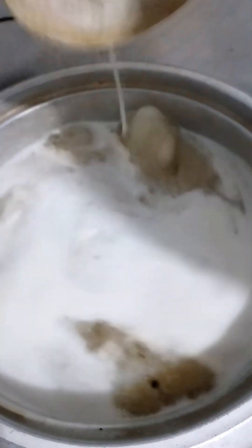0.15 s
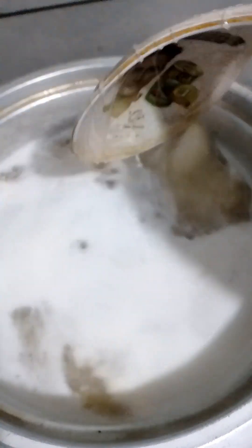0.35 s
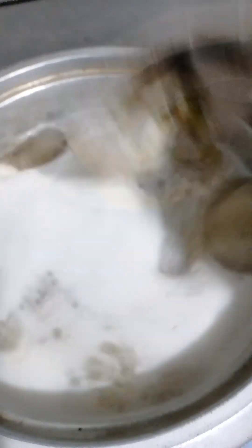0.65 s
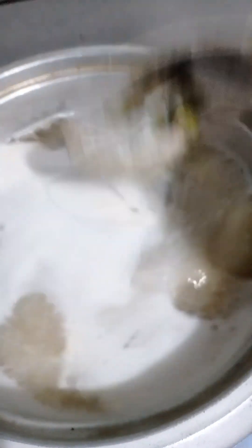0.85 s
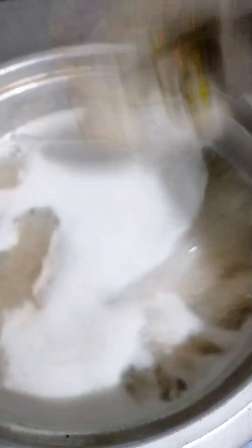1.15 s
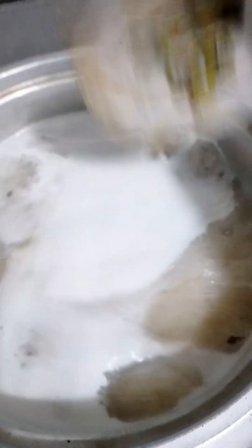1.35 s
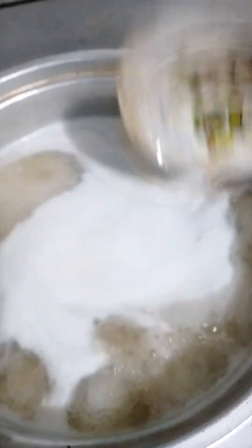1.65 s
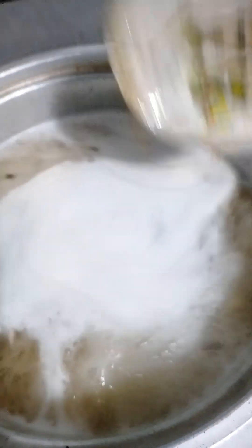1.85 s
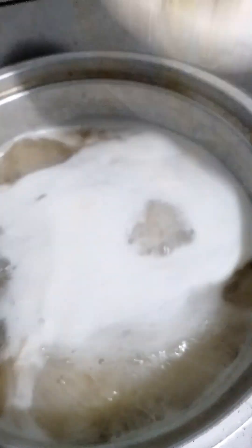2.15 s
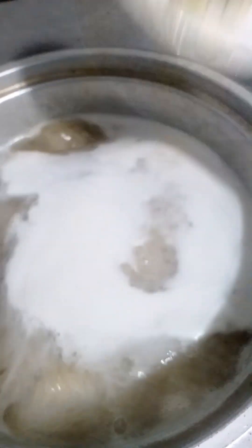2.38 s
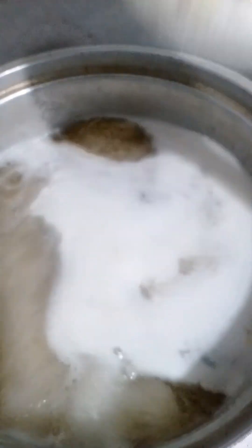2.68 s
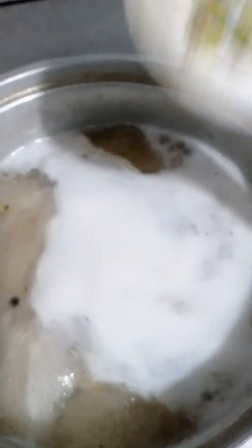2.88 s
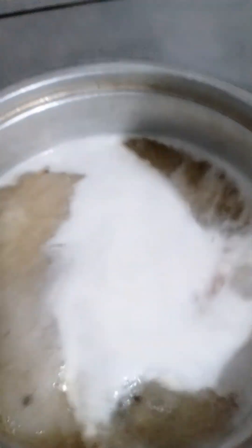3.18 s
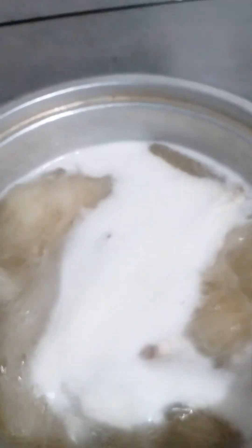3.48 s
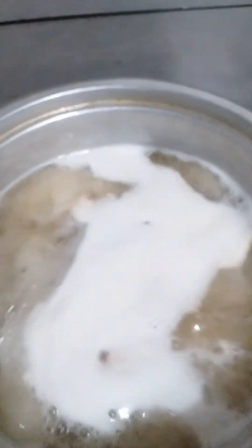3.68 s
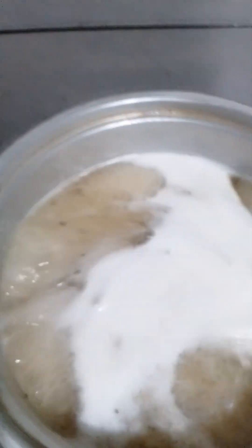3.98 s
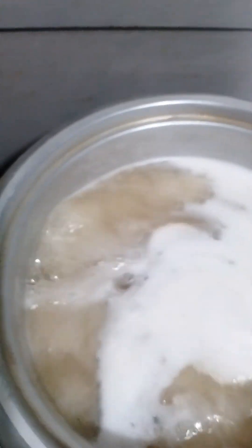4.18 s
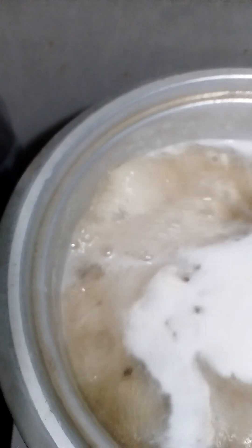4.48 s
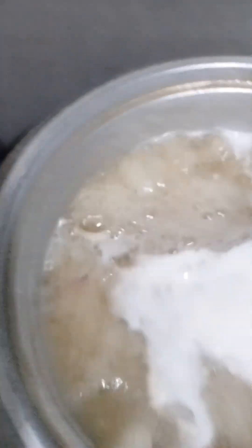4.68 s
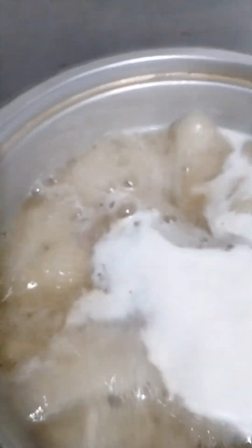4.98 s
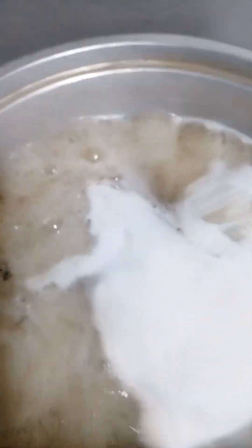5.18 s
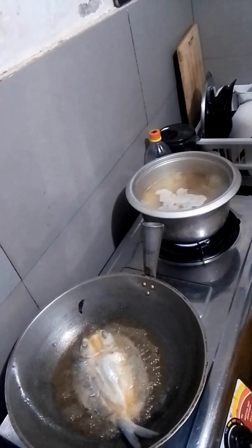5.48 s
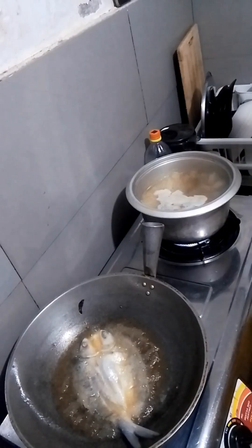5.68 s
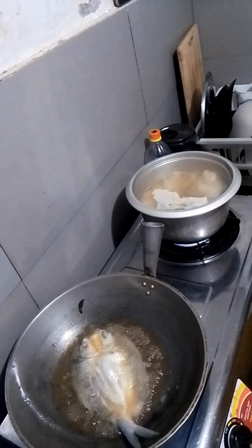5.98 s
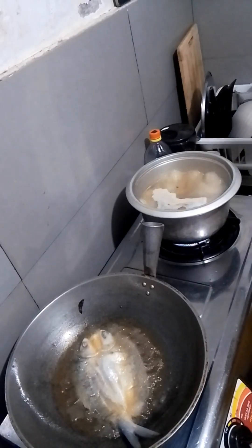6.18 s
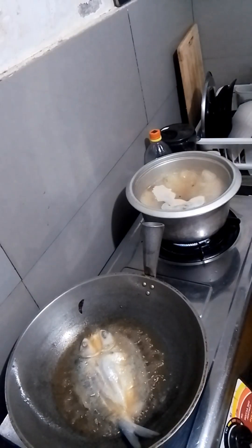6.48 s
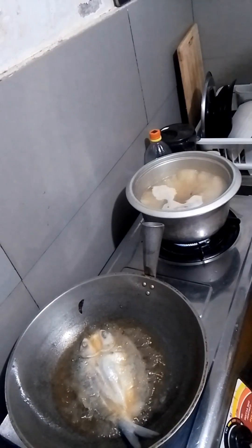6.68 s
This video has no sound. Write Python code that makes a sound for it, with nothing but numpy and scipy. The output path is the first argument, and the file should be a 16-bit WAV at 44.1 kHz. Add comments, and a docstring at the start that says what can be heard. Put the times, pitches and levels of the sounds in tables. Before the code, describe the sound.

A pot simmers on a gas burner, a china bowl clinks down, then a fish sizzles and crackles in hot oil.

```python
"""In a small tiled kitchen a pot simmers on a gas burner. Utensils knock lightly, and stray water drops
spit now and then in the hot oil of a wok. A china bowl is set down and rocks on its foot with a
rattling clink. The sound clicks off for a moment. Then a whole fish is frying close by, over the burner
and a faint hum: bursting bubbles swell into a dense crackle and fizz, with larger pops of steam."""
import sys
import numpy as np
from scipy import signal
from scipy.fft import rfft, irfft, next_fast_len
from scipy.io import wavfile
from scipy.ndimage import uniform_filter1d, map_coordinates

SR = 44100
rng = np.random.default_rng(int(sys.argv[2]) if len(sys.argv) > 2 else 0)


def dump(signal):
    """Clip the signal to [-1, 1] and save it as 16-bit WAV at the path in sys.argv[1]."""
    limited = np.clip(np.atleast_2d(signal).T, -1, 1)
    pcm = np.round(limited * 32767).astype(np.int16)
    wavfile.write(sys.argv[1], SR, pcm)


N = 301644
TIME = np.arange(N) / SR
AGE = np.arange(SR // 2) / SR  # seconds since the start of a single hit
BREAK_S, FRY_START_S = 5.453, 5.549  # silence lies between these
TOP_HZ = 15800


# The tone of the fizzing oil. Each row: frequency in Hz, gain in dB.
FIZZ_EQ = [(120, -35.5), (200, -7.5), (236, -19.5), (340, -3.5), (393, -17), (499, -7), (633, -23.5),
           (774, -5), (1120, -11), (1520, -10.5), (3220, 1), (6000, -11.5), (8030, -17), (12500, -36.5),
           (15800, -32.5)]
def frying(coarse_db=-6.5, fine_db=-17, fizz_db=-4, spikiness=0.54):
    """Coarse and fine bubbles over a fizz of tiny ticks; all follow the boil of the oil."""
    coarse = amp(coarse_db) * crackle(count=1200, centre_hz=3210, spread=0.359)
    fine = amp(fine_db) * crackle(count=500, centre_hz=7930, spread=0.063)
    ticks = rng.standard_normal(N) * np.exp(spikiness * rng.standard_normal(N))
    fizz = amp(fizz_db) * unit_rms(coloured(patchy(ticks, depth_db=2.5), FIZZ_EQ))
    return amp(boil_db()) * (coarse + fine + fizz) * (TIME > FRY_START_S)


def crackle(count, centre_hz, spread, scatter_db=3):
    """A shower of bursting steam bubbles, most faint and a few strong."""
    starts = rng.integers(int(FRY_START_S * SR), N, count)
    hz = np.clip(centre_hz * np.exp(spread * rng.standard_normal((count, 1))), 500, 12000)
    strength = amp(scatter_db * np.minimum(rng.exponential(size=(count, 1)), 4))
    offsets = np.arange(384)
    bubbles = strength * ping(hz, cycles=1.3, t=offsets / SR)
    shower = np.bincount((starts[:, None] + offsets).ravel(), bubbles.ravel(), N)[:N]
    shower = mic_colour(kitchen(shower, near_db=-3, room_db=-4.5))
    return shower / np.std(shower[TIME > FRY_START_S])


def boil_db(steady_db=-31, waver_db=0.94, stir_db=2.5, settle_s=0.022):
    """The frying swells in, wavers, and flares briefly as each main pop stirs up the oil."""
    stir = sum((TIME > s) * np.exp(-np.abs(TIME - s) / settle_s) for s, _, _ in STEAM_POPS)
    return steady_db + swell_db() + stir_db * stir + waver_db * wobble(rate=30)


def swell_db(depth_db=8, rise_s=0.19):
    """The frying's fade-in: it climbs to 0 dB, then holds."""
    return depth_db * np.clip((TIME - FRY_START_S) / rise_s - 1, -1, 0)


# The main pops around the fish. Each row: start in seconds, level in dB, pitch in Hz.
STEAM_POPS = [(5.757, -21.5, 2510), (5.814, -24, 2880), (5.93, -23, 2670), (6.004, -15.5, 2680),
              (6.089, -20, 2700), (6.231, -21, 2960), (6.326, -21, 2900), (6.5531, -16.5, 1550),
              (6.613, -18.5, 3800), (6.626, -27.5, 930), (6.658, -23, 2340), (6.7, -25, 2760)]
def steam_pops():
    """Bigger pockets of steam escape from under the fish, a few loud among many lesser ones."""
    out = np.zeros(N)
    lesser = scattered(FRY_START_S, TIME[-1], count=18, db=-25, scatter_db=2, hz=2900, octaves=0.28)
    for start, db, hz in list(STEAM_POPS) + lesser:
        add(out, start, amp(db) * kitchen(ping(hz, cycles=0.89), near_db=0, room_db=-2.5))
    return out * amp(swell_db())


# The clear spits of the heating oil. Each row: start in seconds, level in dB, pitch in Hz,
# snap in dB relative to the tone.
OIL_SPITS = [(0.8109, -29.5, 4980, 1.5), (.9135, -32, 3630, 2), (1.4134, -28.5, 4970, -10),
             (1.549, -25, 8170, -16), (2.3927, -25, 2910, -5), (2.6139, -27, 4820, -8),
             (2.829, -31.5, 5140, -5), (3.1388, -23, 4680, -3.5), (3.8352, -32, 6230, -0.5),
             (3.92, -25.5, 3950, -1), (4.4245, -35, 2800, 2), (4.441, -34.5, 6860, -13)]
def oil_spits(beam_db_per_octave=5, faint_snap_db=-7):
    """Stray water drops burst in the oil, each with a snap and its own pitch."""
    out = np.zeros(N)
    faint = scattered(0, BREAK_S, count=12, db=-44.5, scatter_db=1, hz=2670, octaves=0.39)
    for start, db, hz, snap_db in list(OIL_SPITS) + [(*row, faint_snap_db) for row in faint]:
        bright_snap = np.diff(snap(t60=0.003), prepend=0) / 2
        burst = ping(hz, cycles=1.07) + amp(snap_db) * bright_snap
        # The wok beams the highest spits past the walls, so they sound drier.
        drier_db = beam_db_per_octave * max(np.log2(hz / 4500), 0)
        spit = kitchen(burst, near_db=4.5 - drier_db, room_db=-3 - drier_db, near_t60=0.096)
        add(out, start, amp(db) * spit)
    return out


# The bowl touches down and rocks. Each row: start in seconds, ring level in dB,
# treble roll-off of the ring in Hz, clack level in dB.
BOWL_CONTACTS = [(4.6075, -13, 7000, 2.5), (4.6147, -13, 7000, -3.5), (4.6225, -22, 6000, -15.5),
                 (4.645, -44, 6000, -14.5), (4.665, -12, 2700, -17.5), (4.671, -19, 2600, -16)]
# The china's modes. Each row: pitch in Hz, level in dB, seconds for the after-ring to fall 60 dB.
BOWL_MODES = [(581, -25, 0.42), (1082, -22, 0.25), (1755, -21, 0.53), (2552, -1, 0.3), (2729, -14, 0.26),
              (3095, -14.5, 0.38), (3445, -3, 0.25), (3919, -21, 0.22), (4452, -15.5, 0.3),
              (5173, -25, 0.25), (5373, -16, 0.16), (6471, -24, 0.21), (7036, -31, 0.23), (7709, -30, 0.23),
              (8166, -23, 0.18), (9550, -44, 0.26)]
# The tone of china hitting the counter. Each row: frequency in Hz, gain in dB.
CLACK_EQ = [(25, -14), (80, -17.5), (160, -12.5), (300, -25), (700, -14), (1100, -19.5), (2000, -16.5),
            (2500, -10), (3300, -7.5), (3800, -18.5), (6500, -22), (8200, -24.5), (9300, -39),
            (15500, -43.5)]
def china_bowl(damped_ratio=0.31, after_ring_db=-23, attack_s=0.0029, tilt_db_per_octave=1):
    """Each contact clacks on the counter and pumps the china's modes; resting on its foot damps them."""
    rings, clacks = np.zeros(N), np.zeros(N)
    for hz, db, t60 in BOWL_MODES:
        damped = amp(-60 * AGE / (t60 * damped_ratio))
        after_ring = amp(after_ring_db - 60 * AGE / t60)
        strike = (damped + after_ring) * (1 - np.exp(-AGE / attack_s))
        envelope = np.zeros(N)
        for start, ring_db, rolloff_hz, _ in BOWL_CONTACTS:
            # A soft contact leaves the high modes quiet.
            add(envelope, start, amp(ring_db) * strike / np.sqrt(1 + (hz / rolloff_hz) ** 4))
        tilt_db = tilt_db_per_octave * np.log2(min(hz, 4000) / 2500)  # low modes radiate less well
        rings += amp(db + tilt_db) * envelope * np.sin(2 * np.pi * (hz * TIME + rng.random()))
    for start, _, _, clack_db in BOWL_CONTACTS:
        clack = coloured(snap(t60=0.014), CLACK_EQ)
        clack /= np.linalg.norm(clack)
        add(clacks, start, amp(clack_db) * kitchen(clack, near_db=6.5, room_db=4))
    return kitchen(rings, near_db=-22, room_db=-15) + clacks


# Utensils on pot and stove. Each row: start in seconds, level in dB, pitch in Hz,
# then thud and snap, both in dB relative to the tone.
UTENSIL_KNOCKS = [(0.551, -31.5, 670, 2, -5.5), (2.424, -21.5, 1840, -13, -7.5), (3.495, -43, 815, 2, -30),
                  (4.367, -33, 1700, -13, -5.5), (6.311, -34, 765, -0.5, 1.5), (6.69, -36, 710, 4, -16)]
def utensil_knocks(bounce_s=0.017, bounce_db=-14):
    """A damped tone and a scuff over the stove top's thud and the pan's dull ring, then a weak bounce."""
    out = np.zeros(N)
    stove_thud = ping(hz=275, cycles=0.22)
    pan_ring = amp(-8) * ping(hz=625, cycles=0.46)
    for start, db, hz, thud_db, snap_db in UTENSIL_KNOCKS:
        for delay, touch_db in [(0, 0), (bounce_s, bounce_db)]:
            scuff = amp(snap_db) * snap(t60=0.016) / 2
            blow = ping(hz, cycles=0.48) + scuff + amp(thud_db) * stove_thud + pan_ring
            add(out, start + delay, amp(db + touch_db) * kitchen(blow, near_db=2.5, room_db=3.5))
    return out


# The tone of flame and simmer. Each row: frequency in Hz, gain in dB.
BURNER_EQ = [(20, -12.5), (50, -10), (65, -7), (105, -5.5), (190, -14.5), (350, -16.5), (520, -18),
             (800, -22), (1900, -20), (5000, -35.5), (8100, -34.5), (10000, -45.5), (13000, -56),
             (15800, -47)]
# The hollows of pot and stove. Each row: centre in Hz, half-width in Hz, boost in dB.
STOVE_HOLLOWS = [(104, 4.3, 0), (287.4, 8, 8), (357.4, 3, 11.5), (452, 4.7, 11), (620, 17, 9),
                 (1048, 67, 4.5), (1800, 120, 1)]
def burner(level_db=-49, flutter_db=1, wok_side_db=-1.5, drone_db=-59, drone_hz=106):
    """Flame and simmering pot rush and drone; after the break only the rush goes on, a bit softer."""
    def response(f):
        boost_db = sum(db / (1 + ((f - hz) / width) ** 2) for hz, width, db in STOVE_HOLLOWS)
        return amp(curve_at(BURNER_EQ, f) + boost_db)

    rush = unit_rms(filtered(rng.standard_normal(N), response))
    drone = amp(drone_db) * np.sqrt(2) * np.sin(2 * np.pi * drone_hz * TIME + 1.83 * wobble(rate=5.3))
    rush_db = level_db + flutter_db * wobble(rate=14) + wok_side_db * (TIME > FRY_START_S)
    return amp(rush_db) * rush + drone * (TIME < BREAK_S)


# The appliance hum near the wok. Each row: pitch in Hz, rms level in dB.
HUM_TONES = [(42, -55.5), (60, -74), (120, -57.5), (338, -79)]
def appliance_hum(waver_radians=0.3):
    """A motor and the mains drone faintly under the frying."""
    out = np.zeros(N)
    for hz, db in HUM_TONES:
        out += amp(db) * np.sqrt(2) * np.sin(2 * np.pi * hz * TIME + waver_radians * wobble(rate=5))
    return out * (TIME > FRY_START_S)


# The tiled room's reverb. Each row: frequency in Hz, seconds to fall 60 dB.
ROOM_DECAY = [(100, 0.19), (500, 0.18), (2000, 0.23), (5000, 0.28), (14000, 0.14)]
def kitchen(x, near_db, room_db, near_t60=0.029):
    """Direct sound, a quick flurry of echoes off pan and tiles, then the room's tail."""
    hz, t, spectrum = signal.stft(rng.standard_normal(len(AGE)), SR, nperseg=256)
    decay = amp(-60 * t / curve_at(ROOM_DECAY, hz)[:, None])
    tail = signal.istft(spectrum * decay, SR, nperseg=256)[1][:len(AGE)] * (AGE > 0.005)
    near = snap(near_t60) * (AGE > 0.0015)
    echoes = amp(near_db) * near / np.linalg.norm(near) + amp(room_db) * tail / np.linalg.norm(tail)
    return x + signal.fftconvolve(x, echoes)[:len(x)]


# The tone of clicks at the microphone. Each row: frequency in Hz, gain in dB.
MIC_EQ = [(30, -1.5), (150, -3), (6500, 2.5), (8200, 5.5), (9500, -9.5), (12500, -20), (15500, -14)]
def mic_colour(x):
    """Clicks get a crisp lift near 8 kHz and lose the air above it."""
    return coloured(x, MIC_EQ)


def ping(hz, cycles, t=AGE):
    """A bursting cavity or a tap: a tone that swells for some cycles and quickly dies."""
    rise = t * hz / cycles
    return rise * np.exp(1 - rise) * np.sin(2 * np.pi * hz * t)


def snap(t60):
    """A burst of noise that falls 60 dB in t60 seconds."""
    return rng.standard_normal(len(AGE)) * amp(-60 * AGE / t60)


def scattered(start, end, count, db, scatter_db, hz, octaves):
    """Random rows of start, level and pitch, one in each equal share of the span."""
    times = start + (end - start) * (np.arange(count) + rng.random(count)) / count
    size, pitch = rng.standard_normal((count, 2)).T
    pitches = np.minimum(hz * 2 ** (octaves * pitch), TOP_HZ / 2)
    return list(zip(times, db + scatter_db * size, pitches))


def patchy(x, depth_db):
    """Spots of a sound flare up and fade at their own pitches and moments."""
    spectrum = signal.stft(x, nperseg=256)[2]
    spots = uniform_filter1d(rng.standard_normal(spectrum.shape), size=6, axis=0)
    spots = uniform_filter1d(spots, size=7, axis=1)
    return signal.istft(spectrum * amp(depth_db * unit_rms(spots)), nperseg=256)[1][:len(x)]


def wobble(rate):
    """A smooth random curve, rate knots a second."""
    return map_coordinates(rng.standard_normal(1024), [TIME * rate], mode="wrap")


def coloured(x, eq, size=4096):
    """Minimum-phase EQ: nothing rings ahead of an attack."""
    cepstrum = irfft(np.log(amp(curve_at(eq, np.fft.rfftfreq(size, 1 / SR)))))
    fold = np.r_[1, np.full(size // 2 - 1, 2), 1, np.zeros(size // 2 - 1)]
    impulse = irfft(np.exp(rfft(cepstrum * fold)))
    return signal.fftconvolve(x, impulse)[:len(x)]


def filtered(x, response):
    """Zero-phase EQ; response gives the gain at each frequency."""
    size = next_fast_len(len(x) + SR // 2)
    return irfft(rfft(x, size) * response(np.fft.rfftfreq(size, 1 / SR)), size)[:len(x)]


def curve_at(points, hz):
    """Read (Hz, value) points on a log frequency axis."""
    knots_hz, values = np.transpose(points)
    return np.interp(np.log(hz + 1), np.log(knots_hz + 1), values)


def amp(db):
    """Decibels to gain."""
    return 10 ** (np.asarray(db) / 20)


def unit_rms(x):
    """Scale to rms 1."""
    return x / np.sqrt(np.mean(x ** 2) + 1e-20)


def add(track, start_s, sound):
    """Mix a sound into the track."""
    start = int(round(start_s * SR))
    track[start:start + len(sound)] += sound[:N - start]


def scene():
    """All sources at one microphone."""
    hits = mic_colour(oil_spits() + utensil_knocks() + steam_pops())
    bed = burner() + appliance_hum()
    return (bed + hits + china_bowl() + frying())[None]


# The clicks as the sound breaks off. Each row: start in seconds, level in dB, pitch in Hz.
BREAK_CLICKS = [(5.443, -28.5, 1880), (5.4496, -19.5, 700), (5.4511, -18, 1480)]
def record(dry):
    """The sound clicks off for a moment; everything above TOP_HZ is cut."""
    out = dry[0].copy()
    for start, db, hz in BREAK_CLICKS:
        click = ping(hz, cycles=0.27) + amp(-23.5) * snap(t60=0.0055)
        add(out, start, amp(db) * click)
    gate = (TIME < BREAK_S) | (TIME > FRY_START_S)
    return filtered(out * gate, lambda hz: hz < TOP_HZ)[None]


dry = scene()
out = record(dry)
dump(out)
```